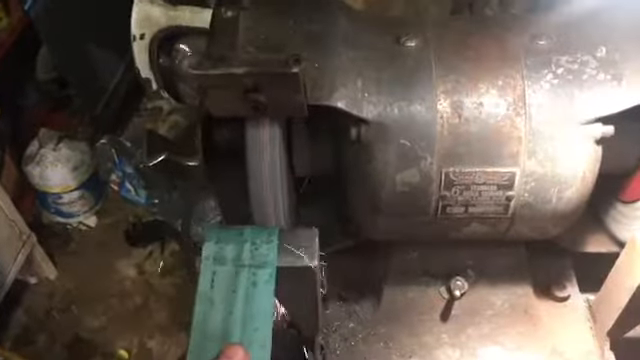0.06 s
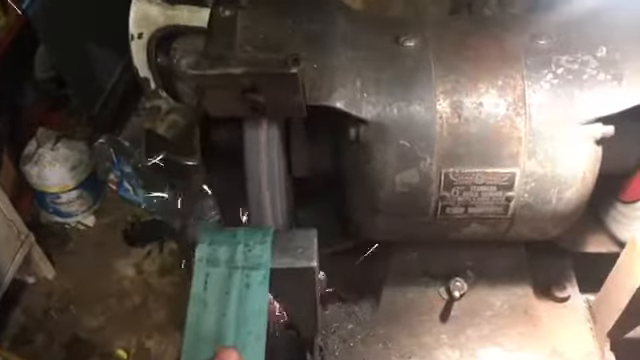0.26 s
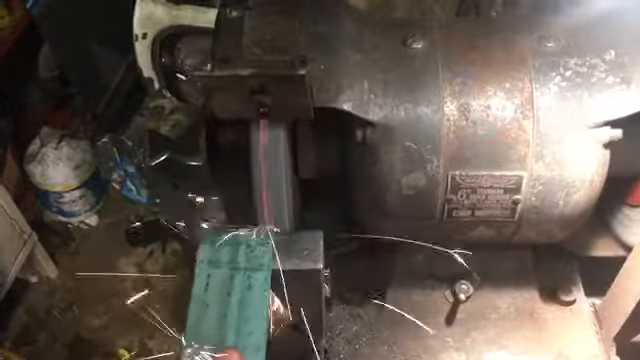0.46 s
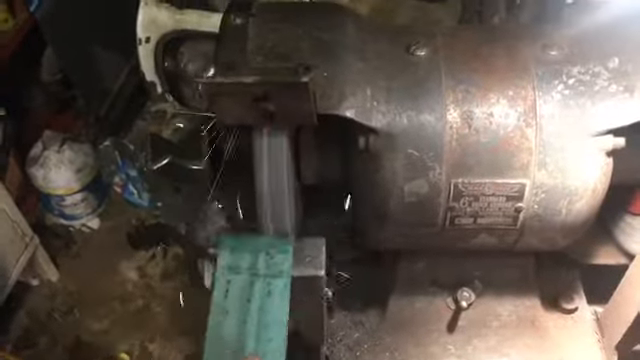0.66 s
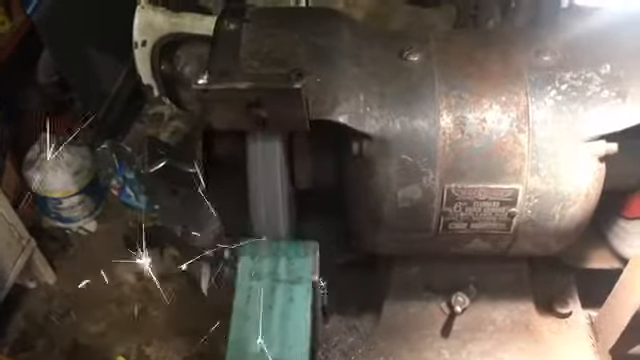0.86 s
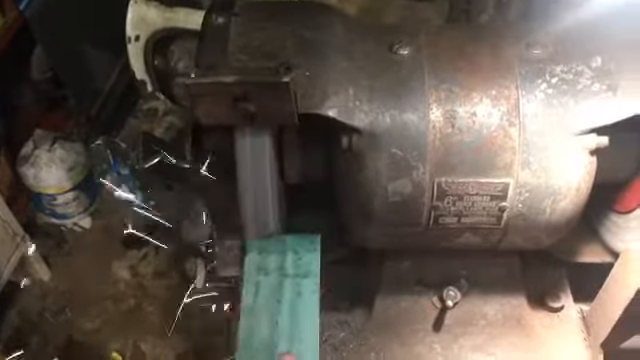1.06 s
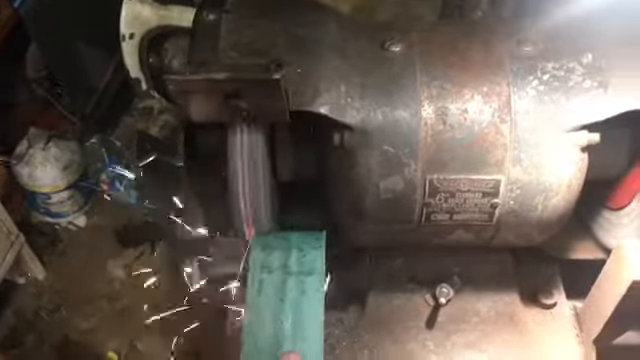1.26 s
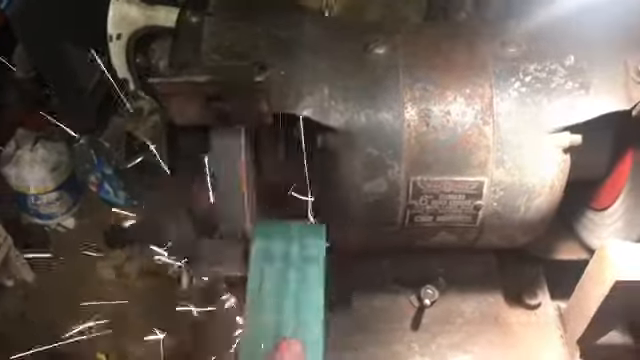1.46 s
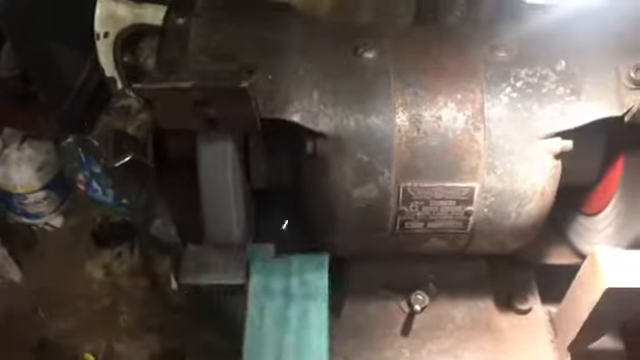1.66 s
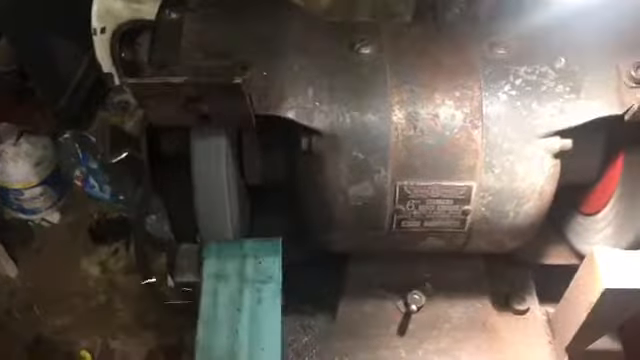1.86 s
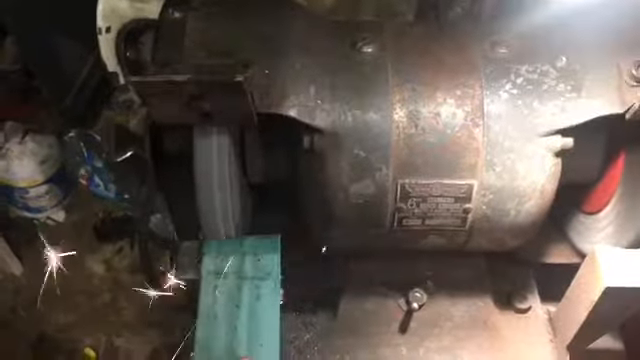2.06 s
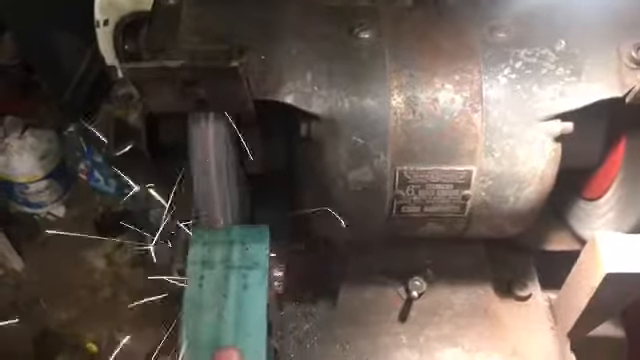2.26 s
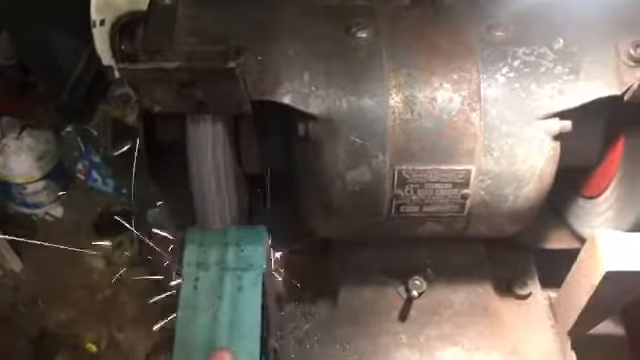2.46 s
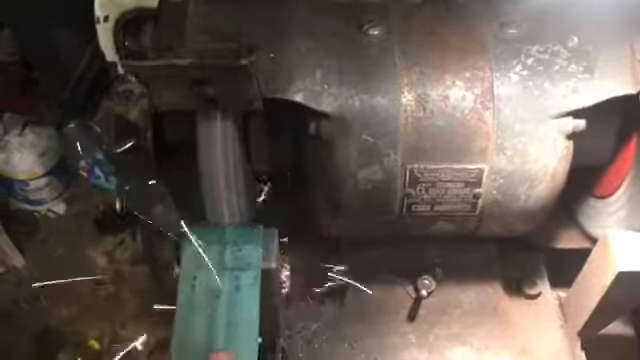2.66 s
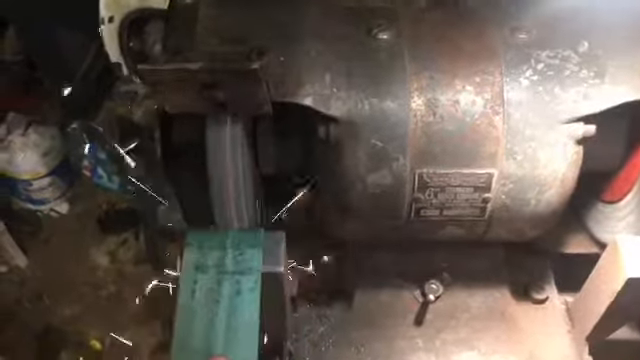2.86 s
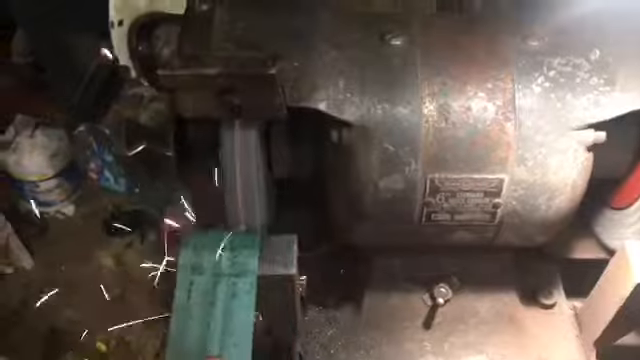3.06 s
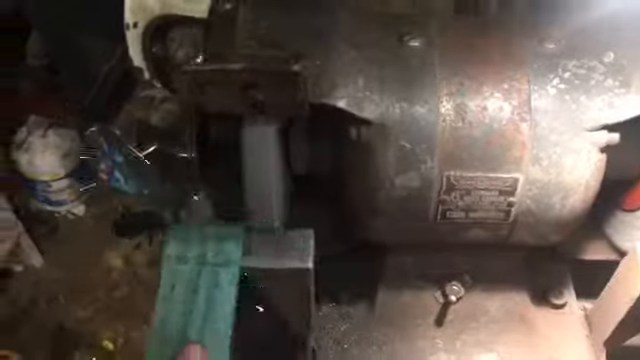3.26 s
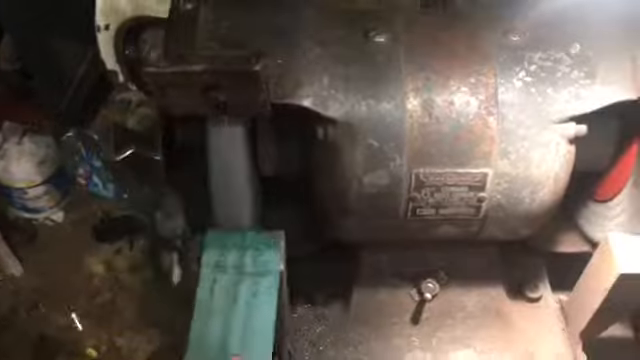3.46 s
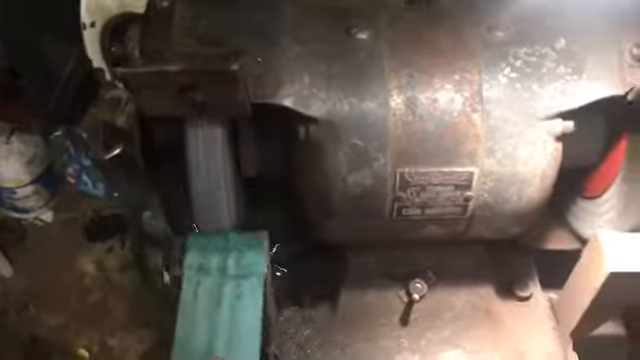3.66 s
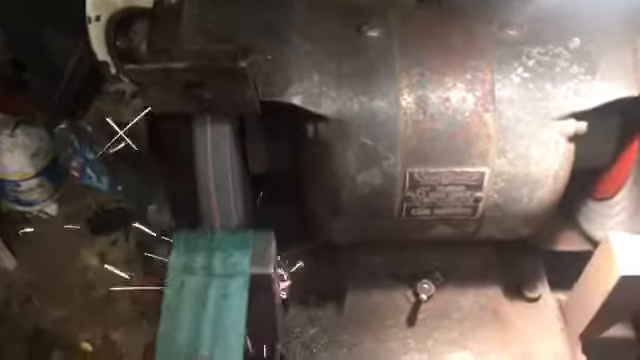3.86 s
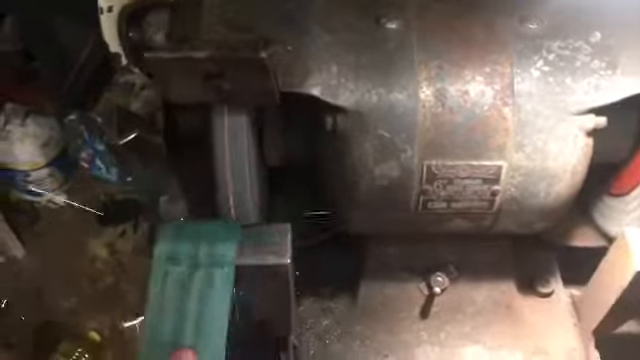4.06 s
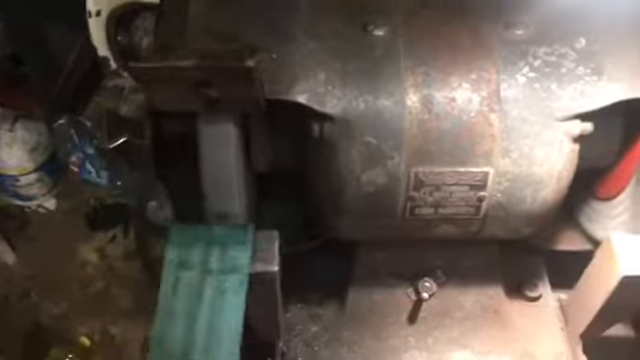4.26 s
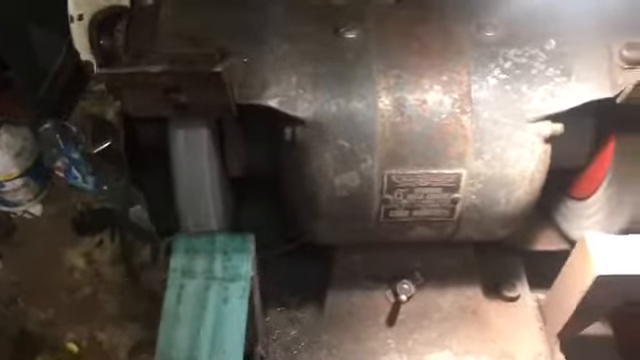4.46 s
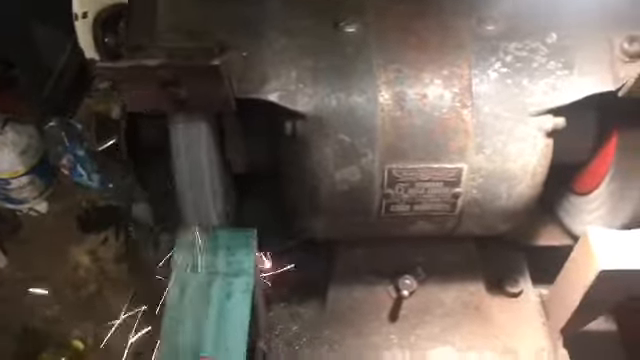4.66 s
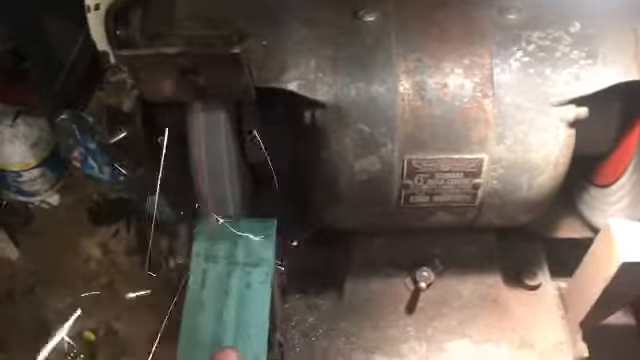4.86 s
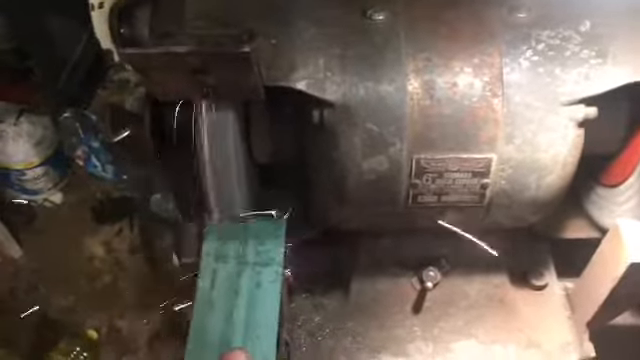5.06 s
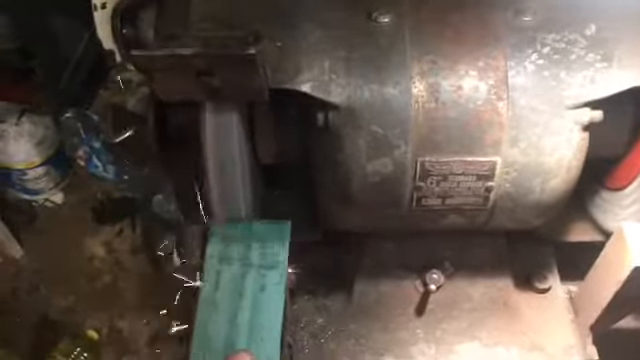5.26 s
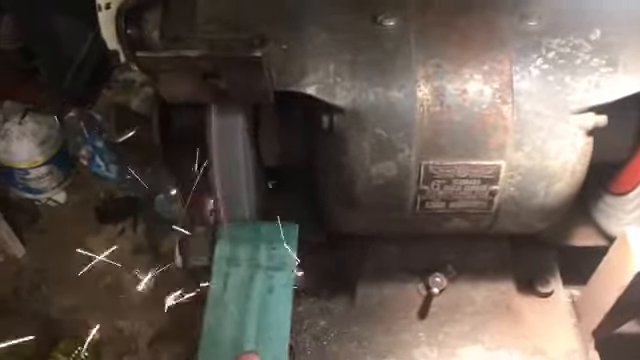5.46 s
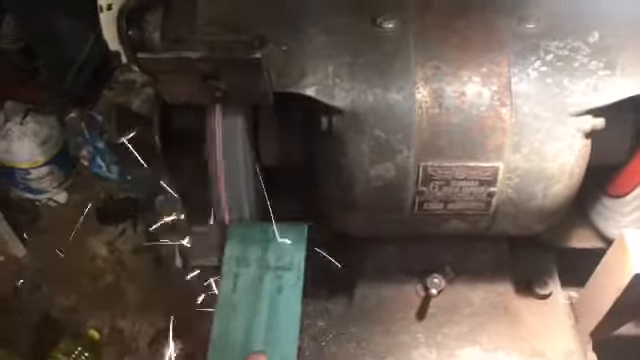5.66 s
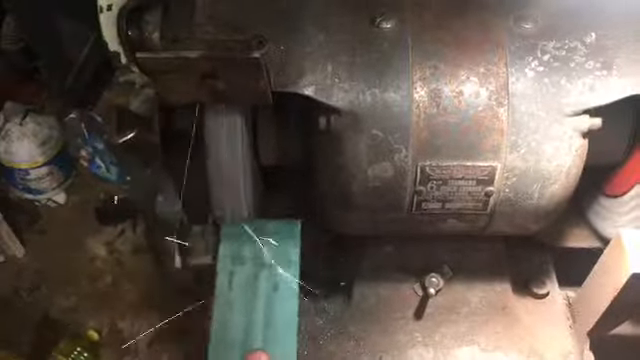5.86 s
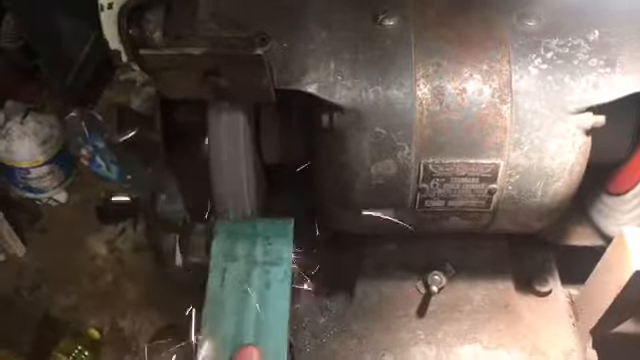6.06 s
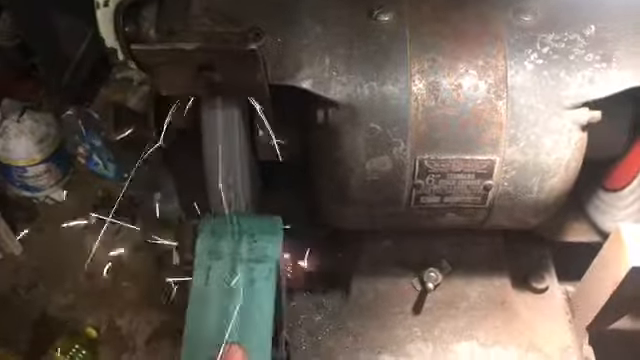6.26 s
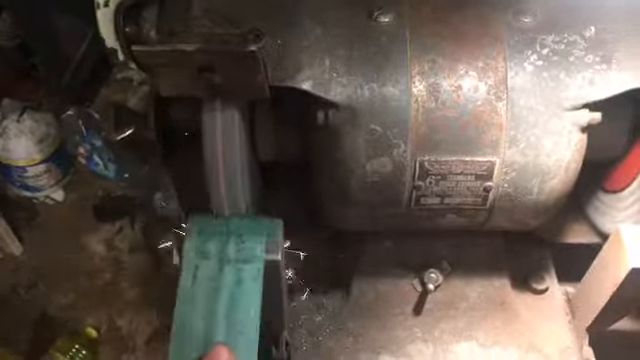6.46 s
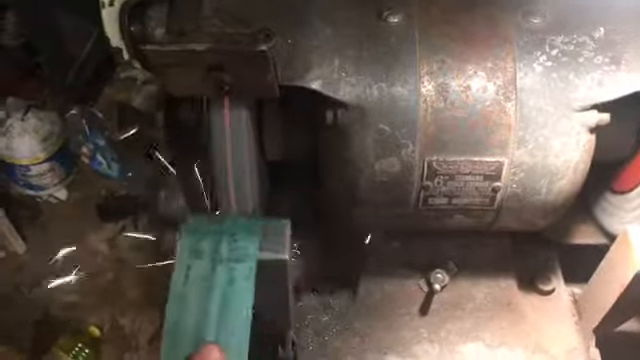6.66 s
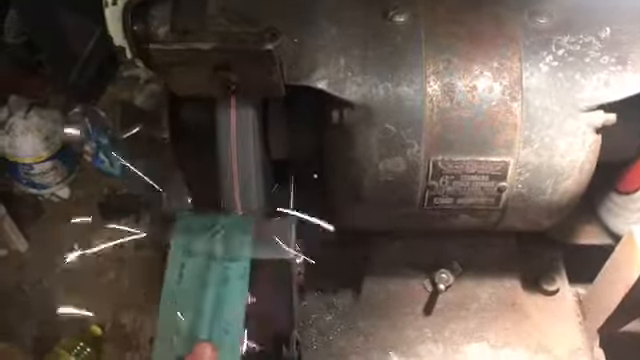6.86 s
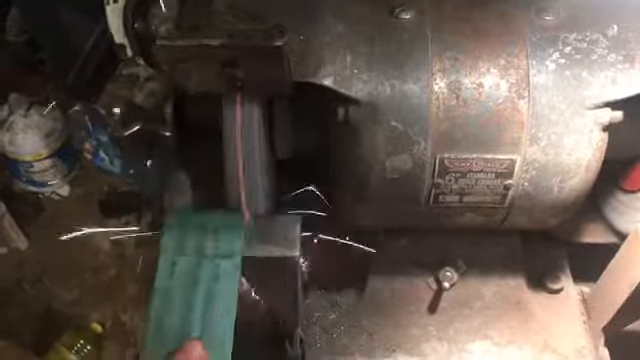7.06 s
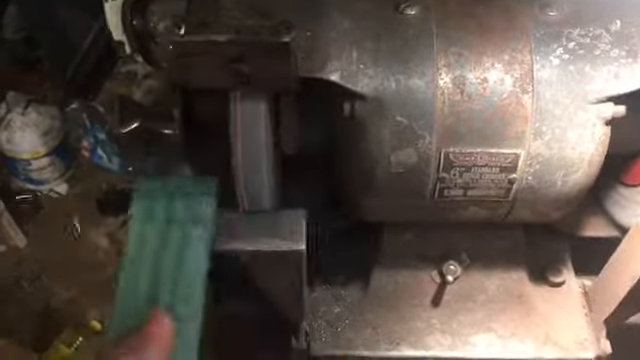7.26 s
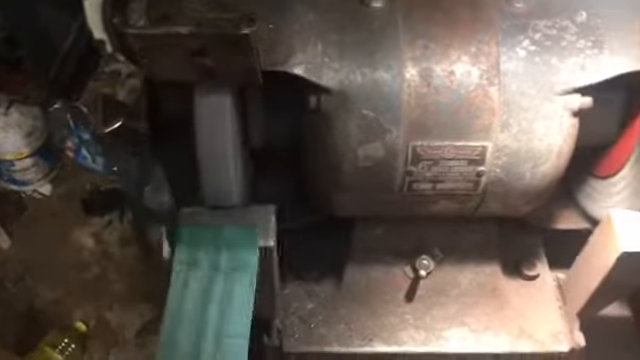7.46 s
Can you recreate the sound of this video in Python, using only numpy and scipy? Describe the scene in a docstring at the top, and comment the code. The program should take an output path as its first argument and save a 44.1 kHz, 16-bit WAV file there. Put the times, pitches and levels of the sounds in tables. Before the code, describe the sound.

A bench grinder is already grinding a steel plate's edge, heard close in a small, fairly dry workshop. The sound is a harsh, gritty hiss with a fast throb and metallic ringing, over a faint motor hum that sags under pressure. Brief squeals swell out of it, and two very soft low bumps sit underneath around 1 second. The first pass ends with a bright bite at about 1.5 seconds, leaving the softer whirr of the wheel. Grinding bites in again from 1.8 to 3.2 seconds, squealing around 2.5, then from 3.4 to 4 seconds. The steel rings faintly after lifting, and the whirr fills each gap. The longest pass runs from 4.4 to 7.1 seconds, with a thin high squeal around 6. The wheel then whirrs freely with a faint whistle until one last short, sharp touch at 7.5 seconds.

```python
"""Steel plate on a bench grinder

A steel plate is pressed edge-on against the wheel in five passes, close up in a small workshop.
The grit rakes the edge in a pattern that comes round every turn and slowly wears; plate and tool rest
ring with it and squeal as the edge catches. Each pass bites, beds in and lets go. The motor sags under
the push and whirrs in between. Two soft low bumps sit under the first pass."""
import sys
import numpy as np
from scipy import signal
from scipy.fft import rfft, irfft, next_fast_len
from scipy.io import wavfile
from scipy.ndimage import uniform_filter1d, map_coordinates

SR = 44100
rng = np.random.default_rng(int(sys.argv[2]) if len(sys.argv) > 2 else 0)


def store_pcm(level_fs):
    """Save levels as 16-bit WAV."""
    pcm = np.round(np.clip(level_fs, -1, 1) * 32767).astype(np.int16)
    wavfile.write(sys.argv[1], SR, np.atleast_2d(pcm).T)


N = 331305
T = np.arange(N) / SR

# the plate on the wheel:
# (touch [s], lift [s], release [s], seating firmness [0-1], after-ring send [dB], whirr gain ride [dB])
PASSES = [(0, 1.46, .036, 0.95, 0, -3), (1.752, 3.155, 0.047, 1, -1, 8), (3.429, 4.011, 0.052, .5, -1, 6),
          (4.35, 7.102, .036, 0.88, -11.5, 10), (7.495, 7.599, 0.035, 0.6, 0, 13)]
# loudness of the grinding, one list for each long pass: (time [s], level [dB])
PASS_LEVELS = [
    [(0.0, -22.5), (0.046, -22.5), (0.454, -22), (0.512, -25.5), (0.556, -21), (0.744, -23.5), (0.99, -20),
     (1.238, -23.5), (1.43, -32.5)],
    [(1.78, -23), (1.952, -18), (2.04, -20), (2.656, -21.5), (2.77, -23.5), (2.782, -21), (2.934, -24.5),
     (3.076, -22), (3.155, -28.5)],
    [(3.46, -25), (3.524, -21.5), (3.8, -19), (3.932, -21), (3.976, -26.5), (4.01, -26.5)],
    [(4.38, -23), (4.51, -19.5), (5.17, -22.5), (5.64, -22), (5.72, -26.5), (5.88, -20.5), (5.9, -22.5),
     (6.95, -21.5), (7.1, -26)],
]
# how hard the hand pushes: (time [s], drag on the wheel [turns/s])
PUSH = [(0.0, 1.51), (0.44, 1.48), (0.47, 1.07), (0.77, 1.45), (1.09, 2.5), (1.41, 0.09), (1.75, 0.3),
        (2.29, 2), (2.79, 2), (3.15, 1.18), (3.51, 0.17), (3.7, 1.93), (3.87, 2), (4.39, 0.0), (4.54, 1.55),
        (5.41, 1.25), (5.81, 0.38), (5.99, 0.96), (6.85, 1.84), (7.1, 1.5)]
# how the plate is held: (time [s], sideways shift [relative], lean [relative], brightness [dB/octave])
HOLD = [(0, -.7, -0.036, 1.2), (.35, -0.16, -0.034, 1), (.58, -0.82, -0.028, 1), (.75, -0.71, -0.44, 0.5),
        (.97, 0.24, -0.55, -0.4), (1.4, -0.0012, -0.97, 0.4), (1.76, -0.53, -1.14, 0.75),
        (2.15, -0.48, -.36, -.1), (2.4, -0.73, -.32, 1), (2.85, -0.74, 0.31, -0.16), (3.15, -.35, 0.47, .5),
        (3.5, 0.63, 0.55, 0.2), (3.72, -0.61, 0.25, .5), (3.9, -.5, 0.55, -0.2), (4.36, .96, .45, 0.8),
        (4.62, 0.29, 0.18, -.15), (5, 0.71, 0.06, 0.8), (5.75, 1, .3, -0.54), (6.27, 0.37, 0.28, 0.6),
        (6.5, -0.44, 0.75, -1), (7.06, .1, 0.43, 0.3), (7.5, .88, 0.46, -0.5)]
# the edge digs in, briefly louder and brighter: (time [s], boost [dB], brightness [dB/octave])
BITES = [(1.447, 5.5, 4.5), (1.755, 5.5, 1.5), (3.436, 5, 1.6), (4.354, 3, 0), (7.5, 8.5, 1.4)]
# resonances of plate and tool rest:
# (frequency [Hz], width [Hz], level [dB], change with shift [dB/unit], change with lean [dB/unit])
PLATE_MODES = [(322, 32, -21, 4.5, 8), (492, 42, -13, 0.8, -0.5), (660, 50, -16, 1.5, 0.5),
               (768, 17, -20, -8.5, -2), (1238, 132, -4, 0.5, 6), (1318, 60, 1.25, -11, -2.5),
               (1476, 111, -1.5, 3.5, 1.5), (1736, 59, -6.5, -4, 1), (1990, 175, -4, -5.5, 1.9),
               (2187, 88, -1.2, 6.5, -4.5), (2395, 176, -2.5, -1, 0), (2950, 340, -10, 0.5, -3),
               (3374, 207, -5, 2.5, -3), (3740, 253, -6, 1.5, -1.5), (4147, 190, -7.5, 0.5, -2),
               (4530, 144, -8.5, 1.5, 3), (5220, 390, -11.5, 0.5, -3.5), (6340, 1340, -17.5, -1.5, 1),
               (6850, 290, -16, 8, -4), (7310, 370, -11, 1, 6), (7680, 1300, -19, -5.5, -3.5),
               (8750, 550, -14.5, 3.5, 7.5), (9520, 730, -14.5, 0.5, -4), (11440, 460, -19.5, -0.5, 5),
               (12050, 880, -18.5, 3, 11), (12400, 1030, -24.5, -5, -9.5), (14372, 2600, -23.3, 2, -0.1)]
# the edge catches and squeals: (peak time [s], half-length [s], frequency [Hz], width [Hz], boost [dB])
SQUEALS = [(0.317, 0.18, 2530, 412, 11), (0.567, 0.13, 2145, 84, 14.5), (.7, .12, 5200, 200, 7),
           (1.02, 0.21, 1160, 125, 9), (1.08, 0.14, 9700, 500, 5.5), (2.4, 0.069, 1980, 100, 6),
           (2.48, .25, 5300, 130, 11.5), (2.55, .3, 680, 70, 9.5), (3.043, .09, 4300, 201, 10),
           (3.477, .09, 9630, 520, 12), (3.761, 0.18, 644, 63, 12), (3.85, .22, 5250, 250, 7.5),
           (5.296, 0.3, 2220, 68, 4), (6.05, .11, 2460, 110, 10), (6.1, 0.95, 4950, 150, 10)]
# fine grit crumbles sooner than coarse: (frequency [Hz], weight on the repeating share [factor])
GRIT_SURVIVAL = [(300, 1), (1400, 0.98), (2400, 0.92), (4500, 0.58), (8000, 0.86), (14000, 0.37)]
# the rim's high spots rock the whole plate: (frequency [Hz], throb depth [factor])
THROB_DEPTH = [(300, 0.95), (1300, 0.64), (2300, 0.31), (4000, 0.12), (12000, 0.088)]
# lightly damped steel that rings on after lift-off: (frequency [Hz], t60 [s], relative level [dB])
AFTERRING_MODES = [(2020, .28, -21), (2210, 0.16, -14), (3710, 0.4, -18.5)]
# tone of the grinder's whirr: (frequency [Hz], relative level [dB])
WHIRR_EQ = [(25, -23), (60, -11), (110, -8), (200, -4.5), (500, -1.5), (720, -9.5), (950, -18),
            (1400, -13.5), (2200, -13), (2600, -17.5), (3200, -16), (6000, -22.5), (8500, -15.5),
            (15500, -33)]
# spinning wheel and guard sing faintly: (frequency [Hz], width [Hz], boost at unity send [dB])
GUARD_MODES = [(1430, 30, 4.5), (2030, 46, 6), (2880, 40, 15), (3130, 36, 5), (3380, 40, 11.5)]
# shaft hum: (harmonic [multiple of wheel speed], level before the load's gain [dB])
HUM_HARMONICS = [(1, -79), (3, -73.5), (5, -58.5), (8, -59), (9, -58.5)]
# soft low bumps: (time [s], level [dB])
BUMPS = [(.975, -52), (1.165, -47)]
# slap off nearby hard surfaces: (delay [s], level [dB])
BENCH_ECHOES = [(.00131, -33), (.00227, -19.5), (.00353, -19), (.00491, -17.5), (.00683, -22.5)]
# the workshop's decay: (frequency [Hz], t60 [s])
ROOM_DECAY = [(200, 0.36), (1500, 0.11), (6000, 0.14), (15000, 0.083)]

FRAME = dict(nperseg=1024, noverlap=768)


def grinding(turns, window=3600):
    """The ringing plate, levelled and then ridden by the hand that holds it to the wheel."""
    ring = bench_slap(plate(scrape(turns)))
    power = uniform_filter1d(uniform_filter1d(ring ** 2, window), window)
    return amp(grinding_db()) * ring / np.sqrt(power + 1e-20)


def scrape(turns):
    """Force on the edge: repeating grit plus fresh chips, throbbing as high spots of the rim pass."""
    hz, t, rim = signal.stft(wheel_face(turns, wear_turns=18.5, spread_db=6.0), SR, **FRAME)
    chips = signal.stft(grit(N, spread_db=7.0), SR, **FRAME)[2]
    repeating = np.clip(np.outer(spectrum(GRIT_SURVIVAL, hz), np.interp(t, T, seating())), 0, 1)
    force = signal.istft(np.sqrt(repeating) * rim + np.sqrt(1 - repeating) * chips, SR, **FRAME)[1][:N]
    high_spots = wheel_face(turns, wear_turns=50, spread_db=-2, grains=10)
    throb = amp(np.cos(2 * np.pi * turns) + 0.68 * high_spots) - 1
    force += throb * coloured(force, lambda hz: spectrum(THROB_DEPTH, hz))
    return unit(force * amp(0.83 * wander(rate_hz=19)))  # the hand trembles


def wheel_face(turns, wear_turns, spread_db, grains=768):
    """The grains round the rim, met again on each turn; wear slowly replaces them."""
    keep = np.exp(-1 / wear_turns)
    fresh = grit((int(turns[-1]) + 2, grains), spread_db)
    face = signal.lfilter([np.sqrt(1 - keep ** 2)], [1, -keep], fresh, axis=0, zi=keep * fresh[-1:])[0]
    return unit(map_coordinates(face.ravel(), [turns * grains], order=3, mode="nearest"))


def grit(shape, spread_db):
    """Tiny impacts of abrasive grains, a few much larger than the rest."""
    impacts = rng.uniform(-1.0, 1, shape)
    return unit(impacts * amp(spread_db * np.clip(rng.standard_normal(shape), -2.37, 2.37)))


def plate(force):
    """Plate and tool rest ring; where the edge touches decides how hard each mode is driven."""
    hz, t, drive = signal.stft(force, SR, **FRAME)
    shift, lean, bright_db = curve(HOLD, t)
    bright_db += sum(tilt_db * bite(s, t) for s, _, tilt_db in BITES)
    centre, width, db, by_shift, by_lean = np.transpose(PLATE_MODES)[:, :, None]
    power = resonance(hz, centre, width).T @ amp(db + by_shift * shift + by_lean * lean) ** 2
    octaves = np.log2(np.maximum(hz, 800) / 3000)
    gain = np.sqrt(power) * amp(squeal_db(hz, t) + np.outer(octaves, bright_db))
    gain *= amp(1.19 * drift(gain.shape))  # the contact creeps along the edge
    gain /= np.sqrt(np.mean(gain ** 2, axis=0))  # shape the tone, hold the level
    return signal.istft(drive * gain, SR, **FRAME)[1][:N]


def squeal_db(hz, t):
    """The edge catches: narrow peaks swell out of the grind and sink back."""
    peak_s, half_length, centre, width, db = np.transpose(SQUEALS)[:, :, None]
    return resonance(hz, centre, width).T @ (db * np.exp(-((t - peak_s) / half_length) ** 2))


def grinding_db():
    """Envelope of the passes, with their bites and releases."""
    return curve(np.vstack(PASS_LEVELS))[0] + contact_db() + sum(db * bite(s, T) for s, db, _ in BITES)


def contact_db(approach_s=0.042):
    """The rim's high spots graze the edge, then it holds at 0 dB and lets go."""
    envelopes = []
    for touch, lift, release, *_ in PASSES:
        graze_db = -24.5 * (np.maximum(touch - T, 0) / approach_s) ** 0.72
        release_db = -25 * (np.maximum(T - lift, 0) / release) ** 1.332
        envelopes.append(graze_db + release_db)
    return np.max(envelopes, axis=0)


def bite(peak_s, t, half_length_s=0.017):
    """Short hump of height 1 as the edge digs in."""
    return np.exp(-((t - peak_s) / half_length_s) ** 2)


def seating(loose=0.12, bed_in_drag_hz=1.0, loosen_s=2.9):
    """Share of the scrape that repeats each turn: it grows with the push and wears off during a pass."""
    touch, _, _, firmness, *_ = current_pass()
    bedded = firmness * np.tanh(drag() / bed_in_drag_hz)
    return loose + (1 - loose) * bedded * np.exp(-(T - touch) / loosen_s)


def current_pass():
    """The columns of the latest pass at every moment."""
    table = np.array(PASSES)
    return table[np.searchsorted(table[1:, 0], T)].T


def drag():
    """Pull of the edge on the wheel while they touch, in turns per second."""
    return np.maximum(curve(PUSH)[0], 0) * (contact_db() > -3)


def wheel_turns(idle_hz=59.46, inertia_s=0.0634):
    """The shaft's angle in turns; the heavy wheel slows and recovers a little behind the push."""
    keep, pull = np.exp(-1 / (inertia_s * SR)), drag()
    sag = signal.lfilter([1 - keep], [1, -keep], pull, zi=keep * pull[:1])[0]
    return np.cumsum(idle_hz - sag) / SR


def afterring(grind):
    """A few sharp steel modes store the grinding and let it go slowly."""
    *_, send_db, _ = current_pass()
    t = T[:32768]
    ring = sum(amp(db - 60 * t / t60) * np.sin(2 * np.pi * hz * t) / np.sqrt(t60)
               for hz, t60, db in AFTERRING_MODES)
    return signal.fftconvolve(grind * amp(send_db), ring / np.linalg.norm(ring))[:N]


def whirr(turns, level_db=-55, rise_s=0.21, sink_s=0.42):
    """Background whirr; it rises in each gap and sinks as grinding resumes, like a recorder's auto gain."""
    rush = rng.standard_normal(N) + 0.58 * wheel_face(turns, wear_turns=7.2, spread_db=0.0)
    air = coloured(rush, lambda hz: amp(spectrum(WHIRR_EQ, hz)))
    rides_db = [db * np.exp(-((T - touch) / np.where(T < touch, rise_s, sink_s)) ** 2)
                for touch, *_, db in PASSES]
    return unit(air + guard_song(air)) * amp(level_db + np.max(rides_db, axis=0))


def guard_song(air, covered_send=0.5, bared_at_s=7.38, half_length_s=0.16):
    """The guard sings in the airflow, most when the plate is drawn aside and bares its mouth."""
    song = coloured(air, lambda hz: amp(sum(db * resonance(hz, f, w) for f, w, db in GUARD_MODES)) - 1)
    return song * (covered_send + np.exp(-((T - bared_at_s) / half_length_s) ** 2))


def shaft_hum(turns, idle_gain=0.14):
    """Wavering harmonics of the shaft speed that grow under load."""
    hum = sum(amp(db + 2 * wander(rate_hz=1.6)) * np.sin(2 * np.pi * (harmonic * turns + rng.random()))
              for harmonic, db in HUM_HARMONICS)
    load = np.tanh(amp(grinding_db() + 23.0))
    return np.sqrt(2) * hum * (idle_gain + load)


def bumps(rise_s=0.0082):
    """Dull low thuds with no ring."""
    rumble = unit(coloured(rng.standard_normal(N), lambda hz: resonance(hz, centre_hz=80, width_hz=140)))
    ages = [np.maximum(T - s, 0) / rise_s for s, _ in BUMPS]
    return rumble * sum(amp(db) * age * np.exp(1 - age) for age, (_, db) in zip(ages, BUMPS))


def bench_slap(x):
    """Motor housing, guard and bench top throw the sound straight back."""
    return x + sum(amp(db) * np.interp(T - delay_s, T, x, left=0) for delay_s, db in BENCH_ECHOES)


def workshop(x, predelay_s=0.003):
    """Dense reflections off bench and walls; the treble dies first."""
    hz, t, noise = signal.stft(rng.standard_normal(16384), SR, nperseg=256)
    tail = signal.istft(noise * amp(-60 * t / spectrum(ROOM_DECAY, hz)[:, None]), SR, nperseg=256)[1]
    tail[:round(predelay_s * SR)] = 0
    return signal.fftconvolve(x, tail / np.linalg.norm(tail))[:N]


def amp(db):
    """Decibels to gain."""
    return 10 ** (np.asarray(db) / 20)


def unit(x):
    """Scales to rms 1."""
    return x / np.sqrt(np.mean(x ** 2) + 1e-20)


def curve(rows, t=T):
    """Each column of a table as an automation lane at the times t."""
    s, *columns = np.transpose(rows)
    return [np.interp(t, s, c) for c in columns]


def spectrum(rows, hz):
    """Reads a table on a log-frequency axis."""
    f, value = np.transpose(rows)
    return np.interp(np.log(hz + 1), np.log(f), value)


def resonance(hz, centre_hz, width_hz):
    """A steep-sided resonant peak of height 1."""
    return 1 / (1 + ((hz - centre_hz) / width_hz) ** 2) ** 2


def coloured(x, gain_at):
    """EQs x by a gain given as a function of frequency."""
    size = next_fast_len(N, real=True)
    return irfft(rfft(x, size) * gain_at(np.fft.rfftfreq(size, 1 / SR)), size)[:N]


def wander(rate_hz):
    """Slow random modulation, rms 1."""
    return unit(coloured(rng.standard_normal(N), lambda hz: resonance(hz, 0, rate_hz)))


def drift(shape, frames=60, bins=7):
    """Slow random patches over time and frequency, rms 1."""
    field = rng.standard_normal(shape[::-1])
    for axis in (0, 1, 0, 1):
        field = uniform_filter1d(field, (frames, bins)[axis], axis=axis, mode="wrap")
    return unit(field).T


def scene():
    """Grind, whirr and hum share one shaft speed; the mix sits dead centre."""
    turns = wheel_turns()
    grind = grinding(turns)
    tails = amp(-20.0) * workshop(grind) + amp(-29.5) * afterring(grind)
    mix = grind + tails + whirr(turns) + shaft_hum(turns) + bumps()
    return np.array([mix, mix])


def record(dry, ceiling=0.62, low_cut_hz=40, high_cut_hz=15800):
    """The microphone rounds off the tallest peaks, sheds the deepest bass and limits the band."""
    x = dry / (1 + (dry / ceiling) ** 6) ** (1 / 6)
    x = signal.sosfilt(signal.butter(2, low_cut_hz, "highpass", fs=SR, output="sos"), x)
    return signal.oaconvolve(x, signal.firwin(511, high_cut_hz, window=("kaiser", 9), fs=SR)[None], "same")


dry = scene()
out = record(dry)
store_pcm(out)
```